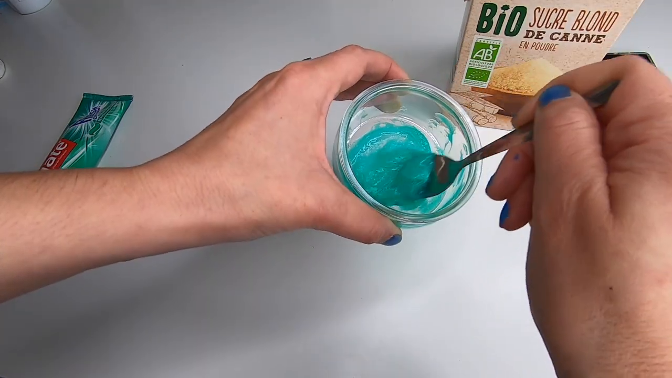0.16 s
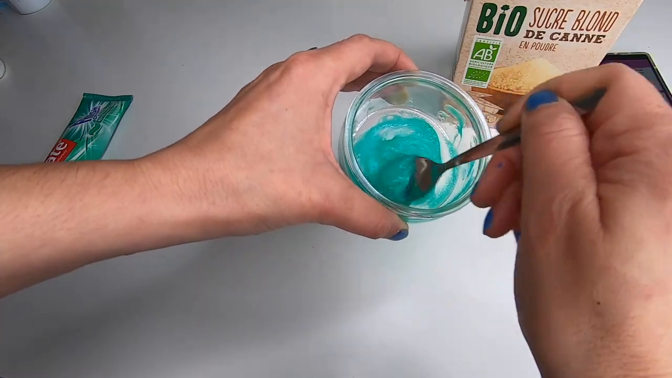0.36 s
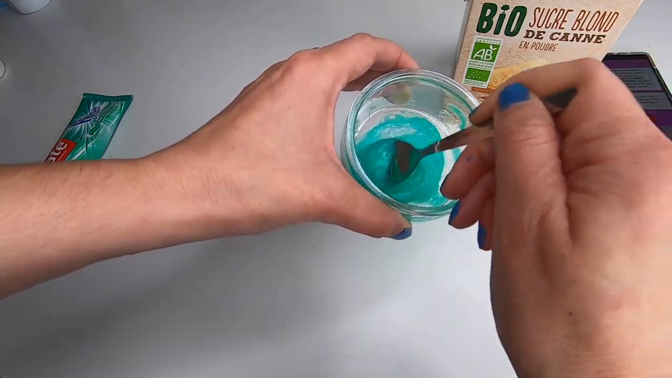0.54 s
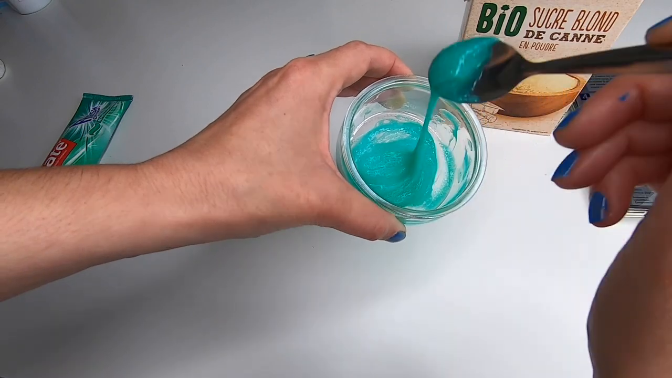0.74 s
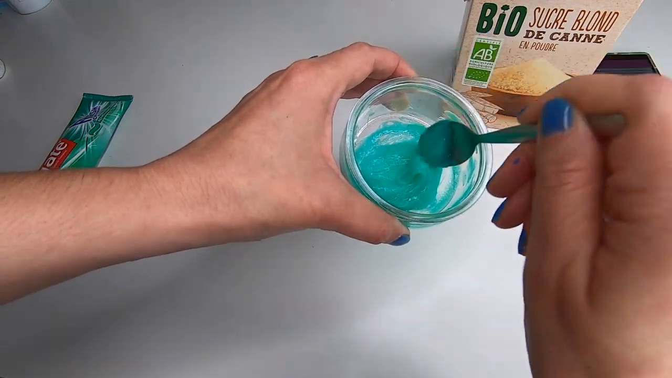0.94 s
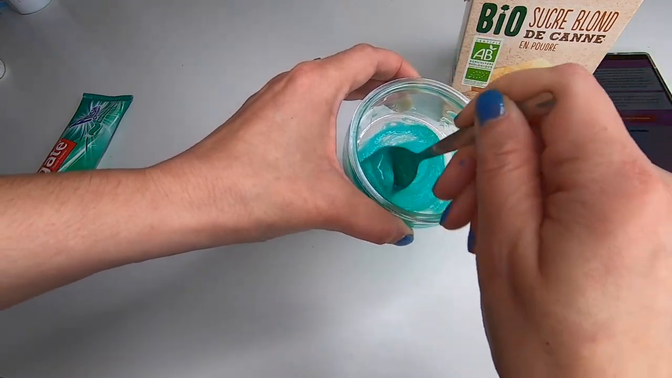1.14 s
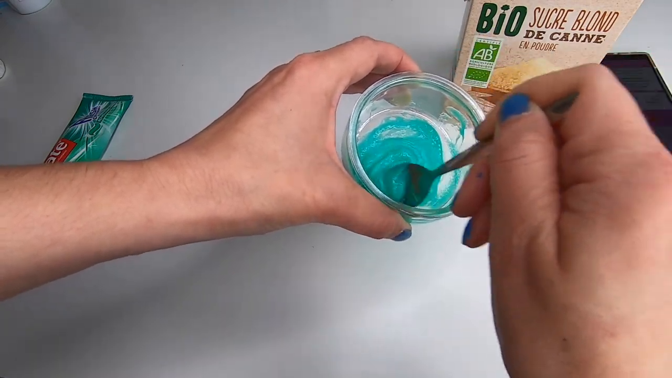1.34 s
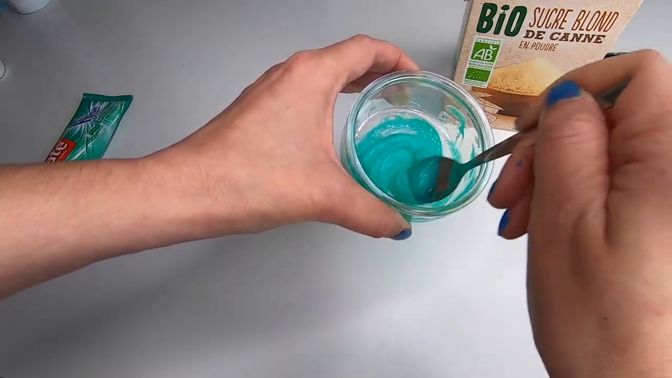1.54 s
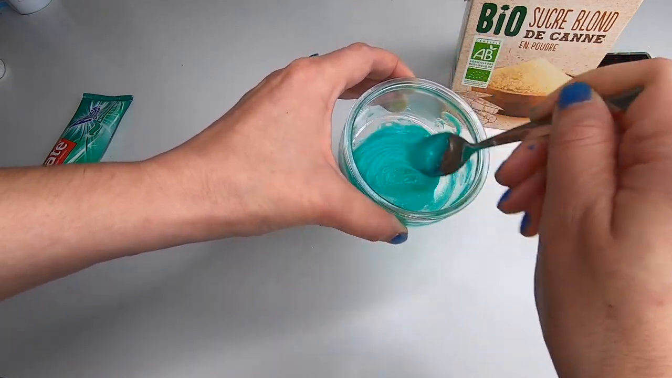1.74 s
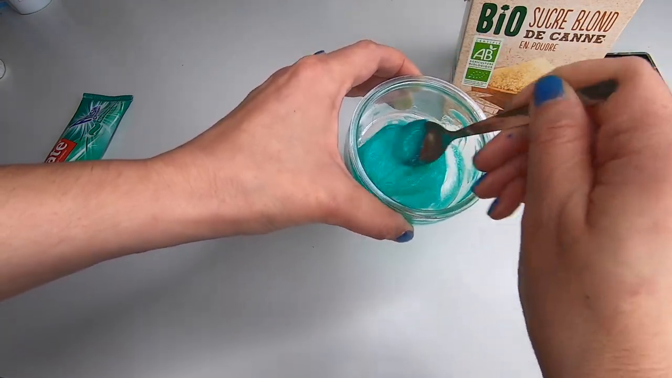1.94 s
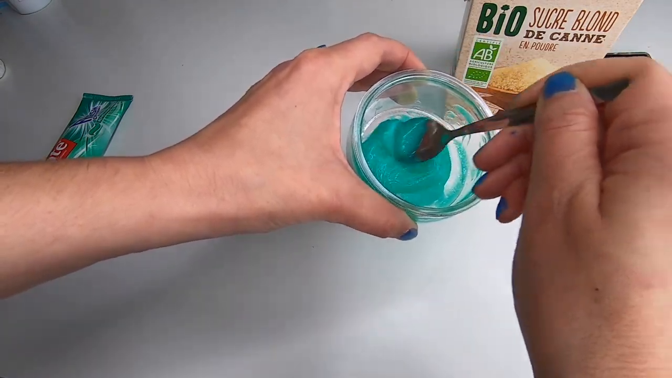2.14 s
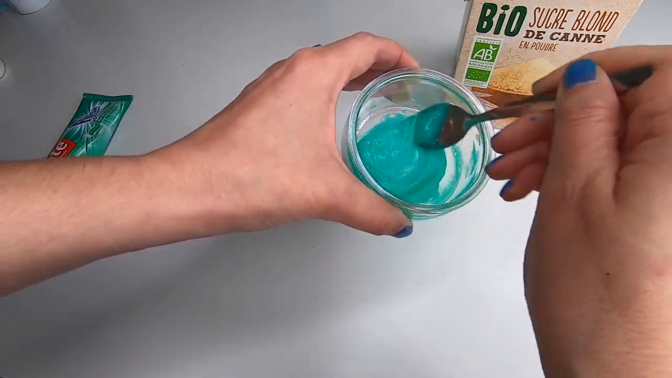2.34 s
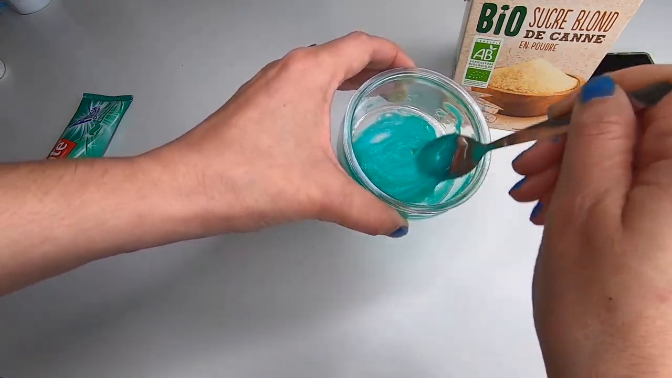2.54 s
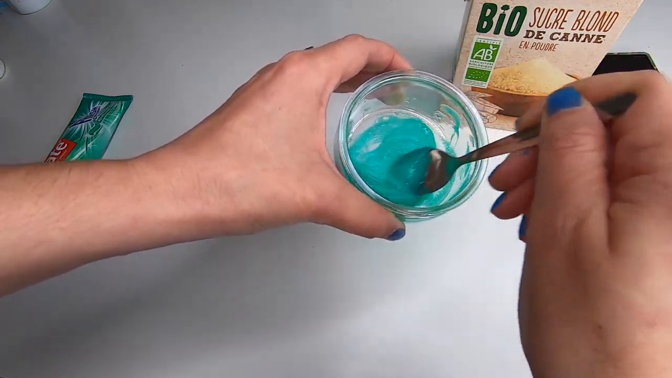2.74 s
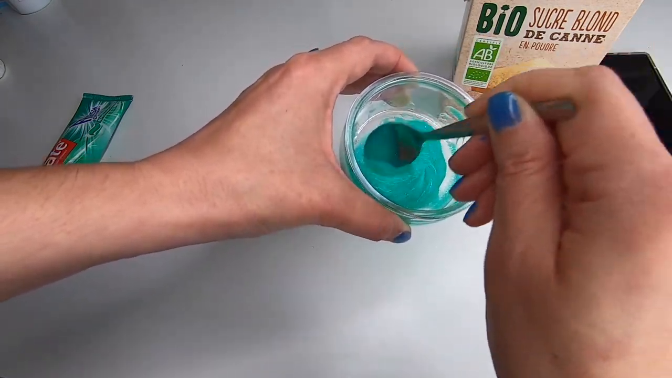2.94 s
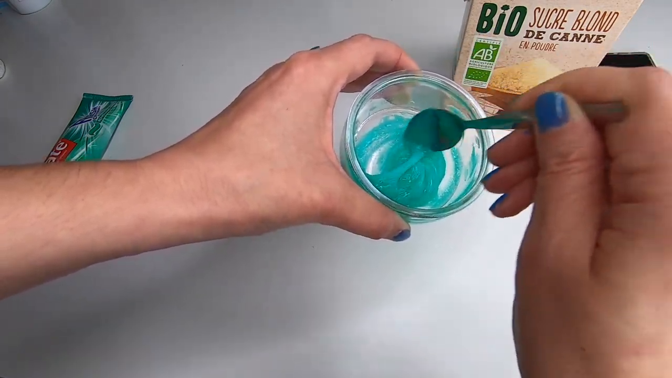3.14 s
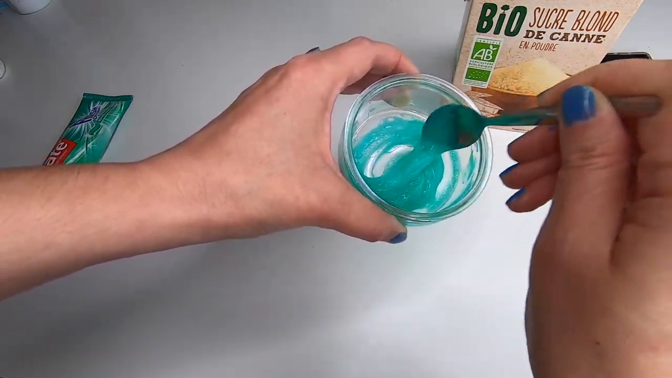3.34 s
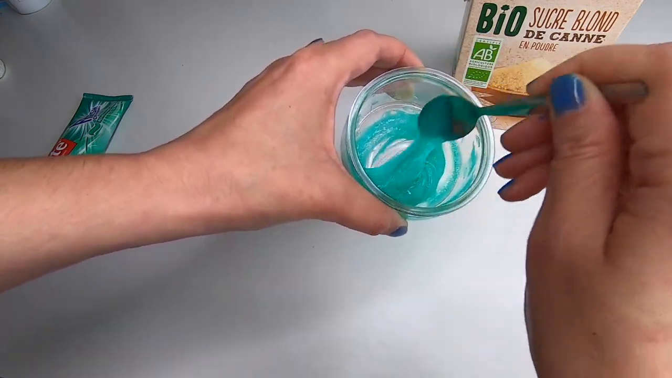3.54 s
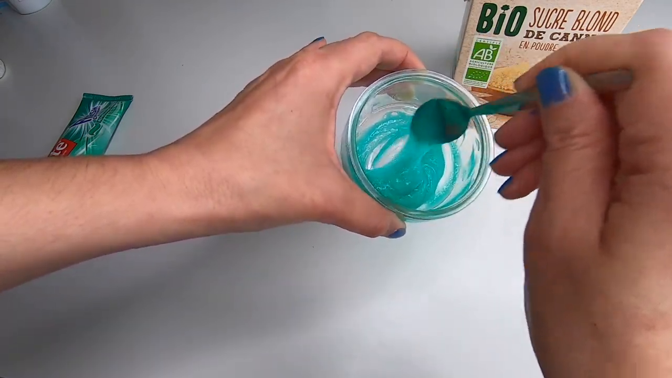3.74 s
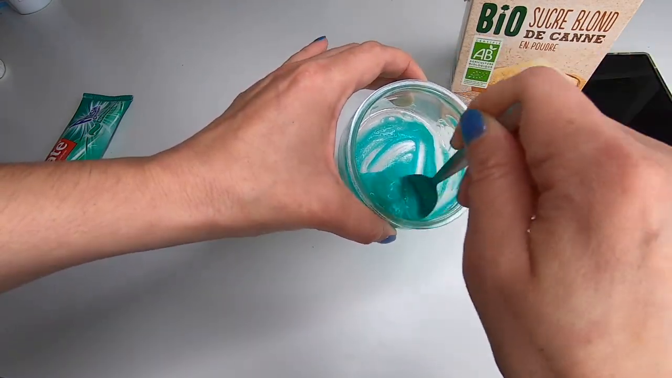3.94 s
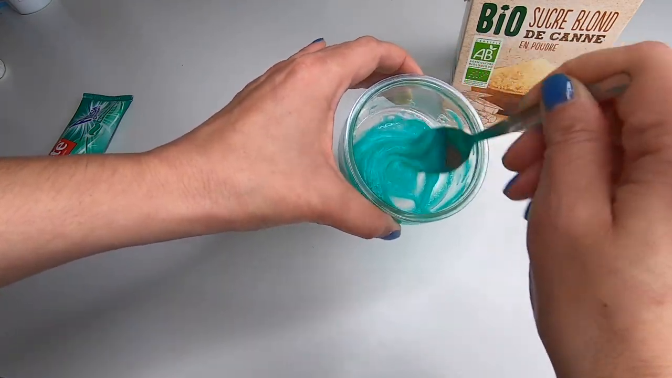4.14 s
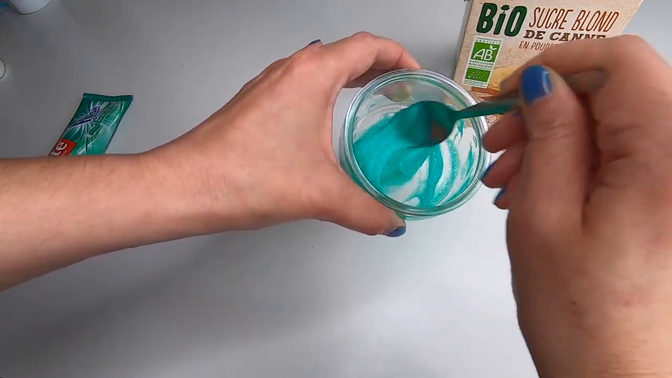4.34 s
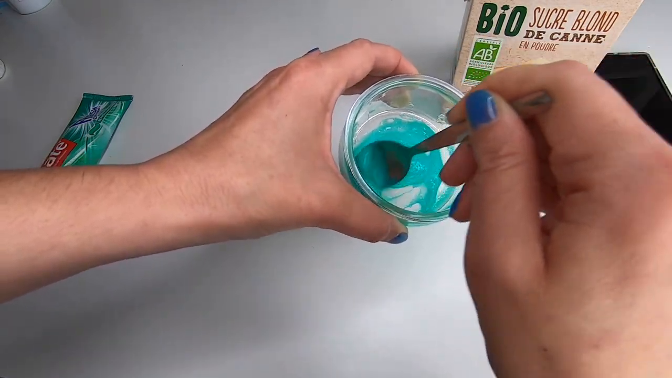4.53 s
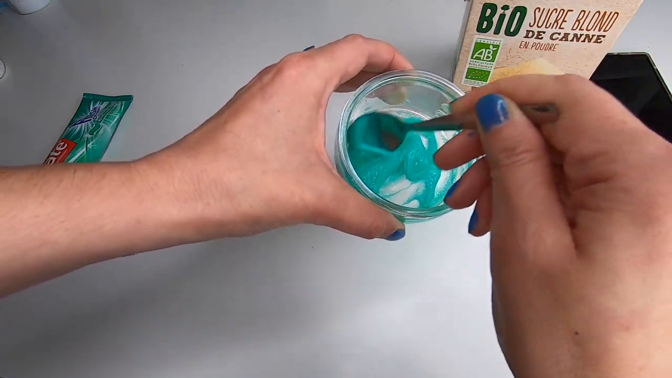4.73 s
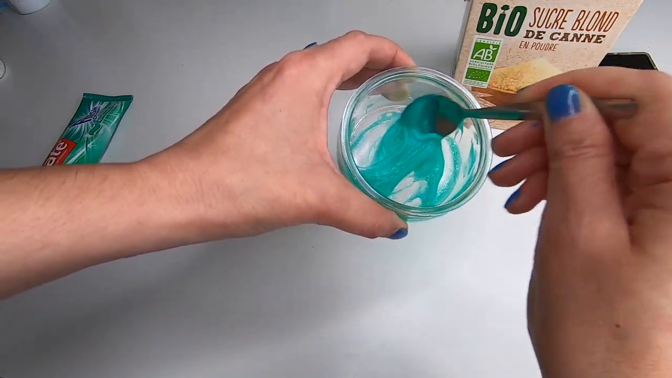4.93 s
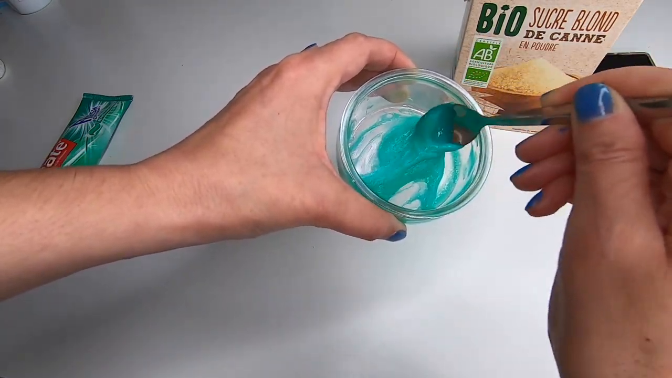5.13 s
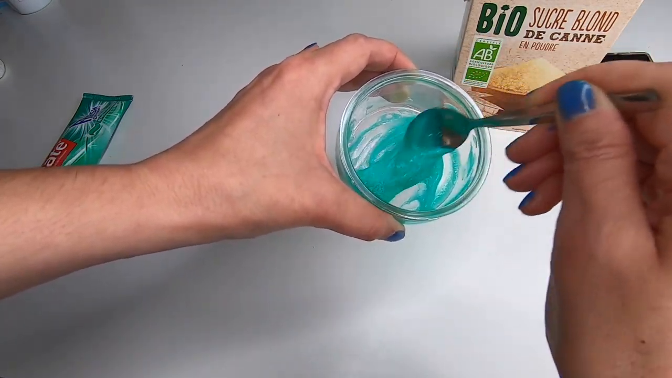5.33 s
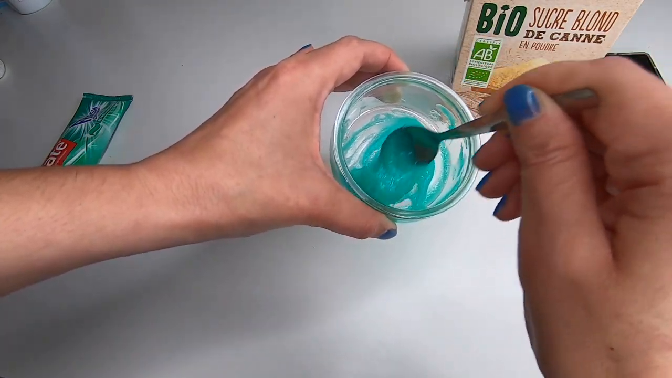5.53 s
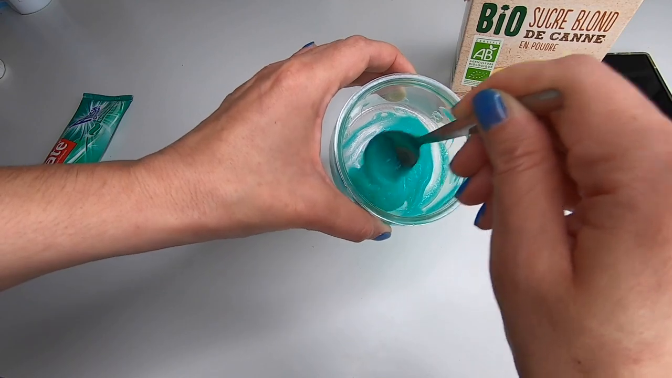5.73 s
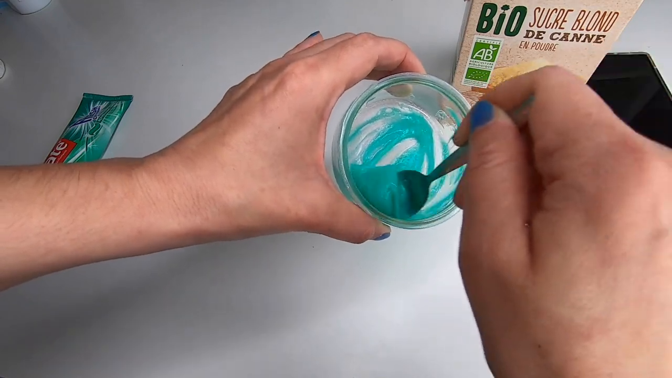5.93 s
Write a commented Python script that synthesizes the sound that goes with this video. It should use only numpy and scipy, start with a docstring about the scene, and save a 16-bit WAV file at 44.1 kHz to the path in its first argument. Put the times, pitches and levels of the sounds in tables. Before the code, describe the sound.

A steel spoon stirs thick, sugary paste in a glass jar. Short, gritty scrapes along the wall mix with light taps, then give way to a steady run of dull, crunchy jabs at the base. A few blows on bare glass leave a thin, brief ring. The microphone is close, in a small room with low background noise and a faint hum that swells near the end.

```python
"""Gritty scrapes and dull knocks: a steel spoon stirs thick, sugary paste in a glass jar.
The jar is held on a table in a small room, close to a camera's stereo microphone.
Sugar grains grind along the wall; taps on the side and jabs at the base excite glass resonances
that the paste cushions, and a few blows on bare glass ring. Behind the jar lies low room noise,
and a faint hum swells towards the end."""
import sys
import numpy as np
from scipy import signal
from scipy.fft import rfft, irfft, next_fast_len
from scipy.io import wavfile
from scipy.ndimage import uniform_filter1d, map_coordinates

SR = 44100
rng = np.random.default_rng(int(sys.argv[2]) if len(sys.argv) > 2 else 0)


def inscribe(sig):
    """Save sig as 16-bit PCM at rate SR to the path in sys.argv[1].

    A 1-D sig is mono; a 2-D sig holds one channel per row.
    Samples are clipped to [-1, 1] before scaling.
    """
    pcm = np.round(np.clip(np.atleast_2d(sig).T, -1, 1) * 32767)
    wavfile.write(sys.argv[1], SR, pcm.astype(np.int16))


N = 263718

# the spoon sweeps round the wall: start t/s, end t/s, pressure/dB, brightness/dB
SWEEPS = [(0, 0.074, -63, -4.5), (0.128, 0.184, -45.5, -1.5), (0.186, 0.287, -45.5, -2.5),
          (0.466, .5, -44, -3.5), (0.615, 0.71, -48.5, -9), (1.22, 1.323, -54.5, -4.5),
          (1.325, 1.449, -46, -4), (1.45, 1.56, -52.5, -7.5), (1.598, 1.681, -44, -1.5),
          (1.768, 1.928, -44, -5), (1.999, 2.092, -47, -8.5), (2.143, 2.221, -48, -10),
          (2.176, 2.272, -50, 3), (2.323, 2.398, -49, -6), (2.404, 2.491, -44.5, -2.5),
          (2.545, 2.619, -51, -7.5), (2.617, 2.755, -45.5, -2), (2.807, 2.837, -51, -7),
          (3.933, 3.974, -67, 14.5), (4.08, 4.135, -47, -3), (4.127, 4.286, -47.5, 0),
          (4.405, 4.467, -42.5, -1), (4.458, 4.542, -47, 0), (5.91, 5.942, -54.5, 8)]
# the spoon jabs down to the base and crunches through sugar:
# t/s, low resonance f/Hz, strength/dB, hardness/dB, thud level/dB, crunch length/s, crunch level/dB
JABS = [(1.0518, 1360, -20.5, 2, -41.5, .06, -50.5), (3.0081, 1390, -31, -1.5, -51.5, 0.06, -45.5),
        (3.2402, 1410, -33, 0, -37, 0.046, -44.5), (3.4629, 1534, -34, 6, -39, 0.05, -44.5),
        (3.6816, 1460, -22.5, 3, -37.5, 0.055, -43.5), (3.8883, 1350, -32.5, -7.5, -36.5, 0.015, -48),
        (3.997, 1900, -23.5, 5.5, -43, 0.098, -48), (4.5739, 1890, -22, 1.5, -47, 0.031, -52),
        (4.7632, 1355, -32, -4, -49, 0.11, -44.5), (5.0274, 2030, -35, -6.5, -53, 0.079, -45),
        (5.2575, 1745, -26.5, -1.5, -43.5, 0.076, -44.5), (5.4742, 1486, -20.5, 2.5, -48, 0.084, -44.5),
        (5.7152, 2090, -21.5, 3.5, -37, 0.059, -44.5), (5.9465, 1870, -20, 7, -39, 0.038, -51)]


def amp(db):
    """Decibels to gain."""
    return 10 ** (np.asarray(db) / 20)


def unit(x):
    """Scale to rms 1."""
    return x / np.sqrt(np.mean(x ** 2) + 1e-20)


def along(points, hz):
    """Read (f/Hz, value) points on a log frequency axis."""
    freqs, values = np.transpose(points)
    return np.interp(np.log(hz + 1), np.log(freqs + 1), values)


def curve(rows):
    """Join (t/s, value) rows into one value per sample."""
    return np.interp(np.arange(N) / SR, *np.transpose(rows))


def wobble(rate):
    """A smooth random curve, rate knots a second."""
    knots = rng.standard_normal(int(N * rate / SR) + 4)
    return map_coordinates(knots, [np.arange(N) * rate / SR])


def filtered(x, response):
    """Filter x by a gain given as a function of frequency."""
    size = next_fast_len(N + SR // 2)
    return irfft(rfft(x, size) * response(np.fft.rfftfreq(size, 1 / SR)), size)[..., :N]


def coloured(x, spectrum):
    """Shape x by (f/Hz, level/dB) points, then scale to rms 1."""
    return unit(filtered(x, lambda hz: amp(along(spectrum, hz))))


def fade(t, t60):
    """Exponential decay, 60 dB in t60 seconds."""
    return np.exp(-np.log(1000) * t / t60)


def add(track, s, sound):
    """Mix a sound into the track at s seconds."""
    start = max(round(s * SR), 0)
    part = track[start:start + len(sound)]
    part += sound[:len(part)]


def tilted(db, hardness_db, balance_db):
    """Levels of the low, middle and high resonance: harder contact tips them towards the treble."""
    return db + np.array(balance_db) + hardness_db * np.array([-1, 0, 1])


def pressure(crunch_hardness=0.5, ease_db_per_s=31, arch_db=-1, brighten_db_per_s=65):
    """The sliding spoon's drive on each resonance: easing in a crunch, brightening in a sweep."""
    # low, middle and high resonance in a crunch and in a sweep: level/dB
    crunch_balance = [-6, 0.5, -1.5]
    sweep_balance = [-1.5, 1, -2.5]
    # how far the same three follow a sweep's brightness: factor
    bright_share = [-0.22, 1, 1.43]
    drive = np.zeros((3, N))

    def stroke(length, rise_s, release_s=0.0058):
        """The spoon bites and lets go: time from mid-stroke, and contact from 0 to 1."""
        t = np.arange(int((length + release_s) * SR)) / SR
        contact = np.clip(np.minimum(t / rise_s, (length - t) / release_s + .5), 0, 1)
        return t - length / 2, contact

    for s, _, _, hardness, _, length, db in JABS:
        t, contact = stroke(length, rise_s=0.0042)
        for band, level in zip(drive, tilted(db, crunch_hardness * hardness, crunch_balance)):
            add(band, s, amp(level - ease_db_per_s * t) * contact)  # the spoon comes to rest
    for start, end, db, bright_db in SWEEPS:
        t, contact = stroke(end - start, rise_s=0.012)
        push = db + arch_db * (np.cos(np.pi * t / (end - start)) - 2 / np.pi)  # dips in mid-sweep
        brightness = bright_db + brighten_db_per_s * t  # the paste is wiped thinner
        for band, offset, share in zip(drive, sweep_balance, bright_share):
            add(band, start, amp(push + offset + share * brightness) * contact)
    return drive


def squelch(x, patchy_db=4.0, pocket_db=2.5, pocket_hz=1325, climb_hz_per_s=7000, width=0.2):
    """Paste covers and bares the wall at random; in a sweep an air pocket shrinks, rising in pitch."""
    hz, t, spectrum = signal.stft(x, SR, nperseg=256)
    patches = uniform_filter1d(rng.standard_normal(spectrum.shape), size=4, axis=0)
    gain_db = patchy_db * unit(uniform_filter1d(patches, size=8, axis=1))
    for start, end, *_ in SWEEPS:
        inside = (t > start) & (t < end)
        pitch = pocket_hz + climb_hz_per_s * (t[inside] - start)
        peaks = sum(np.exp(-(np.log((hz[:, None] + 1) / (ratio * pitch)) / width) ** 2)
                    for ratio in (1, 3.4))  # the pocket's two resonances
        gain_db[:, inside] += pocket_db * (peaks - .5)
    return signal.istft(spectrum * amp(gain_db), nperseg=256)[1][:N]


def scrapes(grains_per_s=6000, size_db=4.5, smear=0.65, grind_db=-1, judder_db=0.73, fizz_db=-9.0):
    """Sugar grains crushed between steel and glass tick into the resonances while the spoon slides."""
    # the three wall resonances under a sliding spoon: f/Hz, relative level/dB
    low = [(100, -38), (520, -36.5), (800, -12), (1100, -5), (1380, 10.5), (1900, 0), (2300, -1),
           (3000, -38.5), (5000, -34)]
    middle = [(800, -81.5), (1900, -0.5), (2450, -8), (2800, 3.5), (3300, 2), (3900, -11), (4600, -11.5),
              (7000, -53)]
    high = [(2500, -61.5), (4300, -14), (5400, 6.5), (6300, 4), (7000, -2), (7900, 0), (9500, -10.5),
            (10400, -3), (12000, -15), (14000, -18.5), (15300, -34.5)]
    # fizz of crushed sugar: f/Hz, relative level/dB
    fizz_colour = [(3000, -39), (5000, 7), (6200, 12.5), (8500, 2), (9700, 2.5), (10500, -12),
                   (12000, -5.5), (14000, -7.5), (15300, -40.5)]
    hits = rng.random(N) < grains_per_s / SR
    sizes = amp(size_db * np.minimum(rng.exponential(size=N), 5))
    ticks = unit(hits * sizes * rng.choice([-1, 1], N))
    grit = squelch(ticks + smear * rng.standard_normal(N))
    drive = pressure()
    crackle = amp(fizz_db + 4.5 * wobble(760))
    # the finest fizz scatters inside the jar and reaches each microphone differently
    out = crackle * drive[2] * coloured(rng.standard_normal((2, N)), fizz_colour)
    for push, colour in zip(drive, (low, middle, high)):
        stick_slip = amp(grind_db + judder_db * wobble(170))
        out += stick_slip * push * coloured(grit, colour)
    return out


def rub():
    """A soft, low rubbing as the first stroke begins."""
    # swell of the rubbing: t/s, level/dB
    swell = [(0, -92), (.12, -67), (.22, -61.5), (.35, -67), (.6, -77), (.8, -110)]
    # its dull tone: f/Hz, relative level/dB
    colour = [(120, -32.5), (300, -1.5), (450, -11.5), (750, -7.5), (1500, -34.0), (4000, -68.0)]
    return amp(curve(swell)) * coloured(rng.standard_normal((2, N)), colour)


def background(hum_hz=191.4, waver_db=3.4, hiss_db=-75):
    """Room tone: low noise and faint hiss, with a wavering hum that swells late."""
    # course of the hum and of the low noise: t/s, level/dB
    hum_level = [(0, -70), (2.8, -80), (3.5, -78.5), (4.1, -68), (4.7, -67.5), (5, -55.5), (5.4, -51.5),
                 (5.98, -50.5)]
    rumble_level = [(0, -64.5), (.9, -69.5), (2.6, -65), (3.05, -62.5), (3.5, -65), (5.98, -61)]
    # tone of the low noise and of the hiss: f/Hz, relative level/dB
    rumble_colour = [(25, -16), (60, -9.5), (115, -50.5), (140, 3.5), (185, 5), (240, -2.5), (350, -10),
                     (550, -15), (1200, -10), (4000, -32)]
    hiss_colour = [(25, -0.5), (100, 2.5), (500, -8), (850, 11.5), (1500, -30), (4000, -0.5), (9000, -16),
                   (14000, -32), (15500, -45)]

    def stereo_noise(colour):
        """Equal parts of mid and side noise."""
        mid, side = rng.standard_normal((2, N))
        return coloured(np.array([mid + side, mid - side]), colour)

    tone = np.sqrt(2) * np.sin(2 * np.pi * hum_hz * np.arange(N) / SR)
    hum = tone * amp(curve(hum_level) + waver_db * wobble(4.5))
    rumble = amp(curve(rumble_level) - 1) * stereo_noise(rumble_colour)
    return hum + rumble + amp(hiss_db) * stereo_noise(hiss_colour)


def damped(hz, t60, spread):
    """Three damped modes near hz, new for each point of contact, with the energy of 4 ms at rms 1."""
    t = np.arange(SR // 20) / SR
    modes = hz * np.exp(spread * (np.linspace(-1, 1, 3) + .5 * rng.standard_normal(3)))
    ring = np.array([.5, 1, .5]) @ np.sin(2 * np.pi * (modes[:, None] * t + rng.random((3, 1))))
    ring = ring * fade(t, t60) * (1 - np.exp(-(t * hz) ** 2))  # swells within a cycle
    return ring * np.sqrt(.004 * SR / np.sum(ring ** 2))


def struck(db, hardness_db, balance_db, mid_growth=0.1, pivot_db=-38):
    """Levels of the three resonances in a blow: stronger blows favour the middle one."""
    return tilted(db, hardness_db, balance_db) + np.array([0, 1, 0]) * mid_growth * (db - pivot_db)


def knocks(blows, mid_hz, mid_spread, high_hz=6150, crack_db=-8):
    """Each blow (t/s, low f/Hz, three levels/dB) rings the paste-damped wall, with a dry crack."""
    # steel meeting glass: f/Hz, relative level/dB
    crack_colour = [(300, -20), (1500, 2.5), (4500, 5.5), (8000, -0.5), (10400, -11.5), (11500, -17.5),
                    (14000, -22.5), (15300, -46.5)]
    t = np.arange(SR // 20) / SR
    wall, crack_envelope = np.zeros(N), np.zeros(N)
    for s, low_hz, (low_db, mid_db, high_db) in blows:
        add(wall, s, amp(low_db) * damped(low_hz, t60=0.0077, spread=0.12))
        add(wall, s, amp(mid_db) * damped(mid_hz, t60=0.012, spread=mid_spread))
        add(wall, s, amp(high_db) * damped(high_hz, t60=0.019, spread=0.05))
        add(crack_envelope, s, amp(high_db + crack_db) * 2 * fade(t, t60=0.03))
    return wall + crack_envelope * coloured(rng.standard_normal(N), crack_colour)


def high_passed(x, hz):
    """A small jar radiates little bass."""
    return signal.sosfilt(signal.butter(3, hz, btype="highpass", fs=SR, output="sos"), x)


def taps():
    """The spoon ticks on the side wall, where the middle resonance is higher and wider than in a jab."""
    # taps on the wall: t/s, low resonance f/Hz, strength/dB, hardness/dB
    wall_taps = [(.3487, 1650, -46.5, -3.5), (0.4681, 1480, -46.5, -12), (.6203, 1460, -40, -10),
                 (0.6369, 1507, -35.5, -8.5), (1.1393, 2140, -28, 8.5), (1.2083, 1720, -32.5, 1.5),
                 (1.29, 1380, -46.5, -10), (1.4602, 1820, -43.5, -0.5), (1.5272, 1500, -40.5, 1.5),
                 (1.6102, 1570, -39, 0), (1.6907, 1560, -26.5, 4), (1.8407, 1800, -44, -12),
                 (1.9241, 1710, -20.5, 5), (2.1243, 1750, -23, -0.5), (2.2732, 1400, -38.5, -1),
                 (2.3706, 1620, -39.5, -12.5), (2.4156, 1870, -39.5, -8.5), (2.5122, 1580, -39, -2.5),
                 (2.6568, 1700, -34, -5.5), (2.7489, 1580, -37.5, 0.5), (2.8084, 1567, -48.5, -6),
                 (3.9564, 2180, -35, 7.5), (3.9612, 2240, -45.5, 13), (4.0089, 1907, -25, 5.5),
                 (4.1867, 1900, -38.5, -0.5), (4.3049, 1400, -25, 2), (4.3954, 1480, -39.5, -2.5),
                 (4.8478, 1506, -24.5, 0.5), (5.4611, 1960, -20, 1.5)]
    # low, middle and high resonance in a tap: level/dB
    balance = [-1.5, -4.5, -10]
    blows = [(s, hz, struck(db, hardness, balance)) for s, hz, db, hardness in wall_taps]
    return high_passed(knocks(blows, mid_hz=3134, mid_spread=0.11), hz=940)


def jabs(graze_lead_s=0.009, graze_db=-31.5):
    """The spoon grazes the glass, then lands on the base, which thuds under the wall resonances."""
    # low, middle and high resonance in a jab: level/dB
    balance = [-4.5, -1, -7.5]
    landings = [(s, hz, struck(db, hardness, balance)) for s, hz, db, hardness, *_ in JABS]
    grazes = [(s - graze_lead_s, hz, levels + graze_db) for s, hz, levels in landings]
    out = knocks(landings + grazes, mid_hz=2845, mid_spread=0.069)
    for s, _, _, _, thud_db, *_ in JABS:
        add(out, s, amp(thud_db) * damped(hz=800, t60=0.0081, spread=0.061))
    return high_passed(out, hz=617)  # the base radiates lower than the curved wall


def thumps(level_db=-54):
    """Each jab pushes the jar on the table, which gives a short, low thump."""
    t, out = np.arange(SR // 20) / SR, np.zeros(N)
    taper = np.cos(np.pi / 2 * t / t[-1])
    for s, *_ in JABS:
        add(out, s, amp(level_db) * damped(hz=270, t60=0.0061, spread=.3) * taper)
    return out


def free_ring(t, spread_db=1):
    """Jar and spoon ring clear of the paste, the modes at slightly new strengths each time."""
    # free modes of jar and spoon: f/Hz, level/dB, t60/s
    modes = [(1390, -18, .15), (2345, -7, .25), (2810, -13, .12), (4340, -28, .25), (5200, -21, .15),
             (5770, -7, .24), (5925, 0, .17), (6240, -12, .15), (7990, -26, .2), (10300, -21, .2),
             (10520, -18, .2), (13400, -27, .25)]
    return sum(amp(db + spread_db * rng.standard_normal()) * np.sin(2 * np.pi * hz * t) * fade(t, t60)
               for hz, db, t60 in modes)


def clinks(chatter_t60=0.026, attack_s=0.00033, rough_db=4):
    """The spoon chatters on bare glass and leaves a thin ring, unsteady as the spoon slides on."""
    # blows on bare glass: t/s, chatter level/dB, ring level/dB
    blows = [(1.1404, -19.5, -38), (1.922, -40.5, -54.5), (2.127, -23.5, -77), (3.999, -9.5, -30),
             (4.016, -21, -54), (4.575, -21.5, -52.5), (5.8964, -23.5, -46)]
    t, out = np.arange(SR // 2) / SR, np.zeros(N)
    onset = 1 - np.exp(-t / attack_s)
    for s, chatter_db, ring_db in blows:
        chatter = amp(chatter_db) * fade(t, chatter_t60)
        tail = amp(ring_db) * amp(rough_db * wobble(67)[:len(t)])
        add(out, s, free_ring(t) * (chatter + tail) * onset)
    return out


def room(x, late_db=-16, near_db=-7.0, near_t60=0.18, build_s=0.022):
    """Nearby table and hands reflect at once; the small room's walls follow with a short tail."""
    # decay of the tail: f/Hz, t60/s
    decay = [(200, 0.33), (1000, 0.33), (3000, 0.32), (6000, 0.34), (10000, 0.27), (14000, 0.027)]
    # tone of the reflections: f/Hz, relative level/dB
    colour = [(200, -2), (500, -6), (1200, -1.5), (3000, -1.5), (6000, 0), (9000, 2), (13000, 4)]
    # left and right are less alike in the treble: f/Hz, correlation
    likeness = [(300, 1), (1300, 0.56), (3000, 0.44), (6000, 0), (10000, 0)]
    t = np.arange(SR // 2) / SR
    hz, frames, (mid, side) = signal.stft(rng.standard_normal((2, len(t))), SR, nperseg=256)
    angle = np.arccos(np.clip(along(likeness, hz), 0, 1))[:, None] / 2
    mid, side = mid * np.cos(angle), side * np.sin(angle)
    spectrum = np.array([mid + side, mid - side]) * amp(along(colour, hz))[:, None]
    waveform = lambda z: signal.istft(z, SR, nperseg=256)[1][:, :len(t)]
    late = waveform(spectrum * fade(frames, along(decay, hz)[:, None])) * np.clip(t / build_s, 0, 1)
    near = waveform(spectrum)[:, ::-1] * fade(t, near_t60) * (t > .001)  # reversed: unlike the tail
    response = amp(late_db) * late / np.linalg.norm(late[0])
    response += amp(near_db) * near / np.linalg.norm(near[0])
    return signal.fftconvolve(x, response, axes=1)[:, :N]


def microphones(hz):
    """The camera's two microphone ports hear the treble at different levels and phases."""
    # level gap between the ports: f/Hz, left minus right level/dB
    level_gap = [(1800, 0), (2250, 2), (2800, -1), (4300, .5), (6200, -2.5), (8000, -1), (9000, 5),
                 (11000, 1.5), (14000, 7)]
    # phase gap between the ports: f/Hz, phase/rad
    phase_gap = [(1000, .15), (3700, .25), (5800, .5), (7600, .6), (9200, 1.3), (11700, .8), (14000, 1.1)]
    half = np.array([[.5], [-.5]])
    return amp(half * along(level_gap, hz)) * np.exp(1j * half * along(phase_gap, hz))


def scene(linger_db=-70):
    """The jar close to the microphones, room tone behind; the glass rings faintly after contact."""
    contact = jabs() + taps() + scrapes()
    ring = free_ring(np.arange(SR // 2) / SR)
    linger = amp(linger_db) * signal.fftconvolve(contact.mean(axis=0), ring)[:N]
    jar = contact + linger + clinks() + thumps()
    return filtered(jar + room(jar), microphones) + rub() + background()


def record(dry):
    """The camera rolls off the highest treble and keeps nothing above its band limit."""
    rolloff_hz, limit_hz = 14700, 15900
    return filtered(dry, lambda hz: (hz < limit_hz) / np.sqrt(1 + (hz / rolloff_hz) ** 50))


dry = scene()
out = record(dry)
inscribe(out)
```